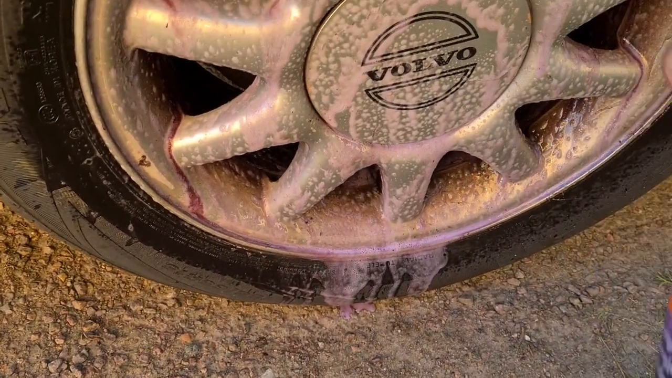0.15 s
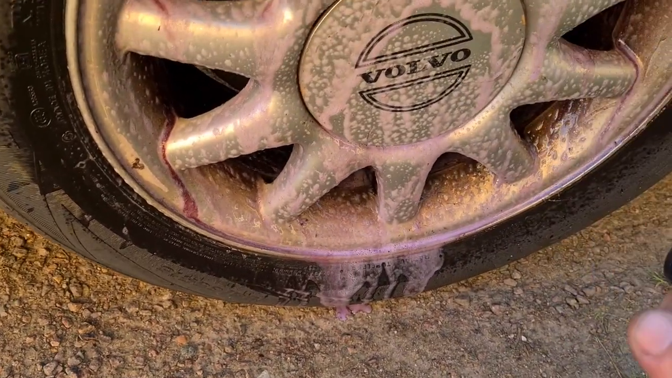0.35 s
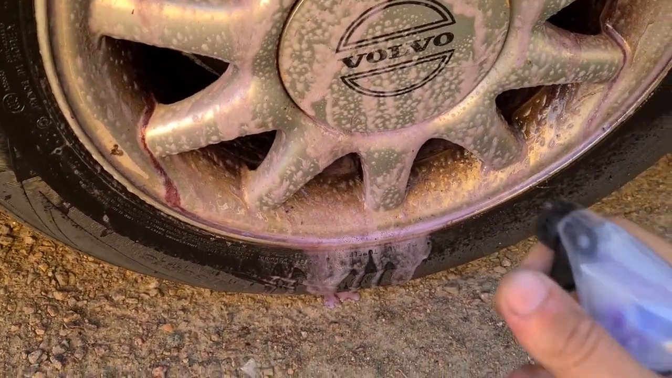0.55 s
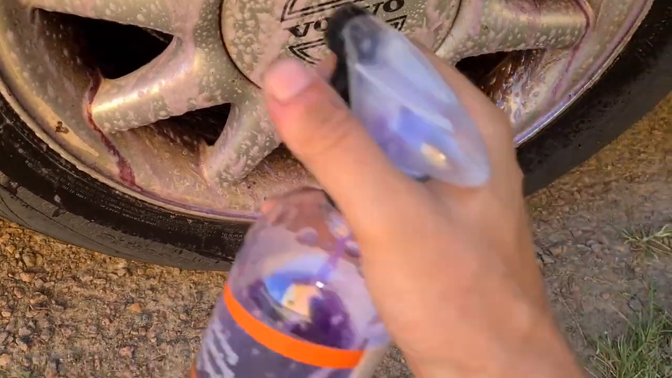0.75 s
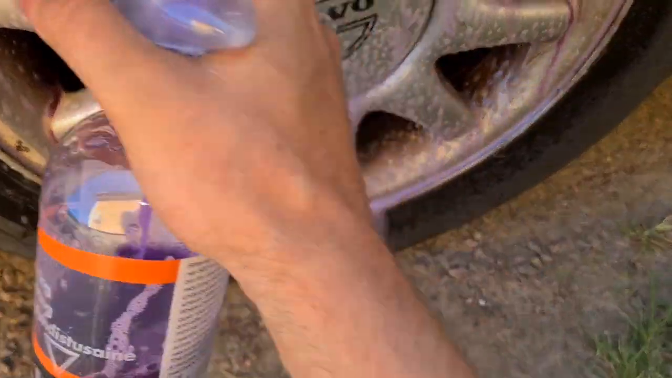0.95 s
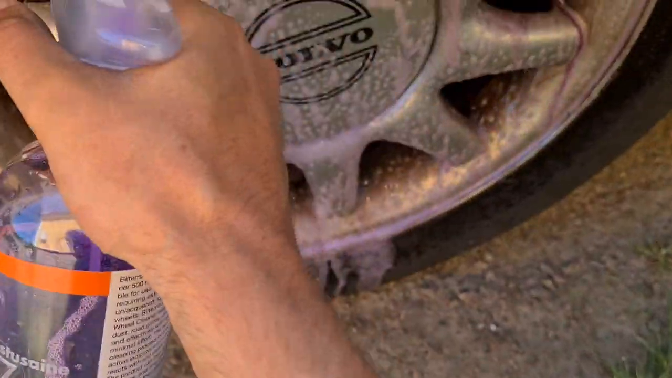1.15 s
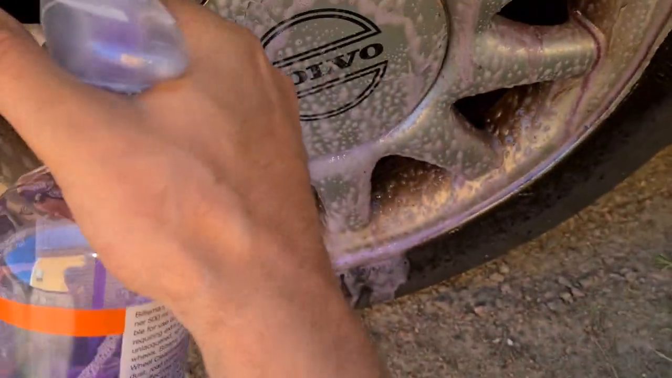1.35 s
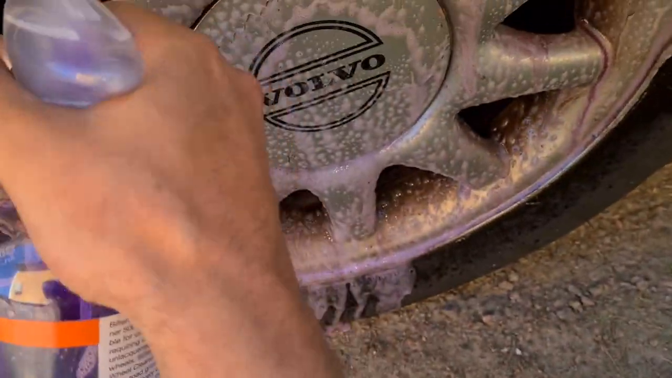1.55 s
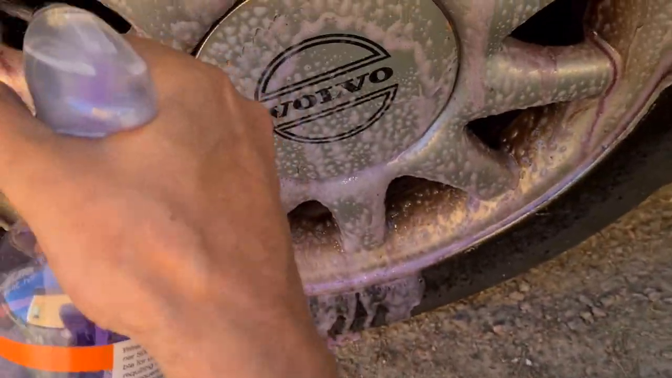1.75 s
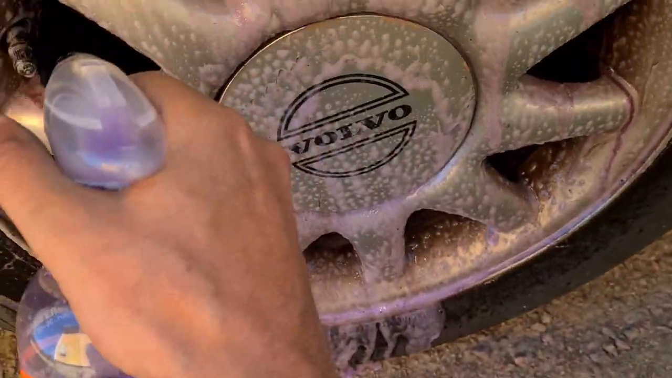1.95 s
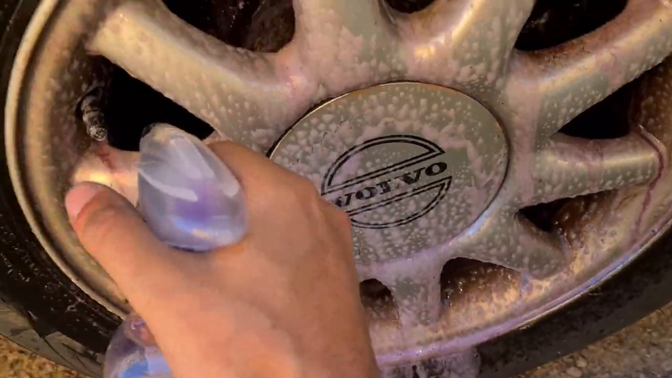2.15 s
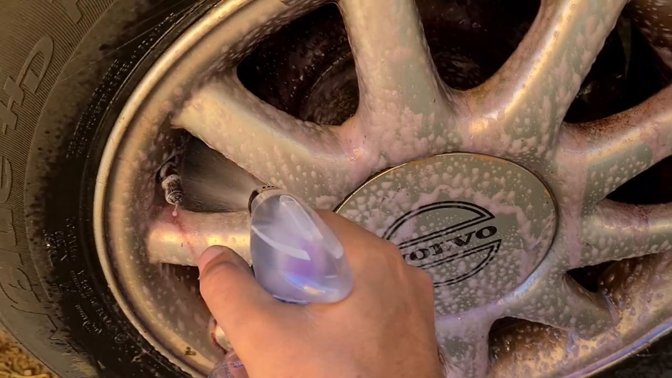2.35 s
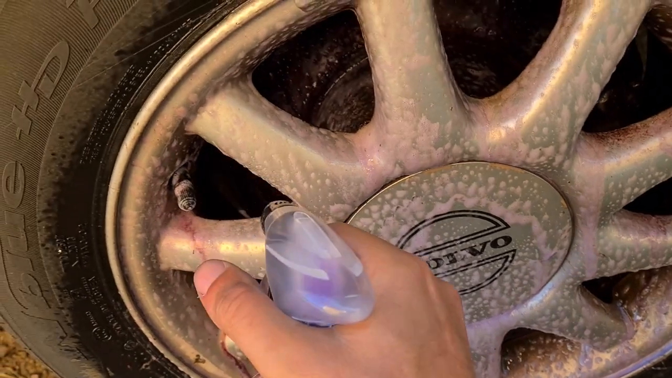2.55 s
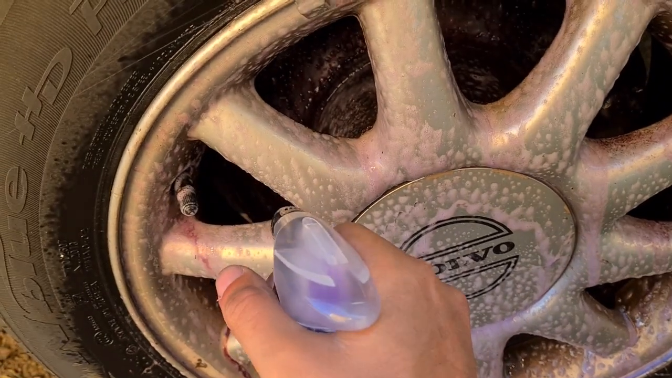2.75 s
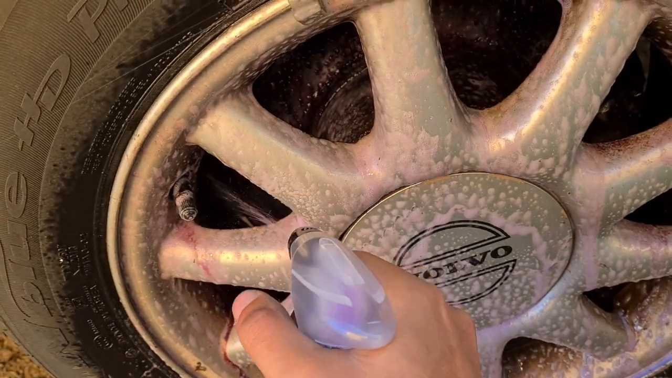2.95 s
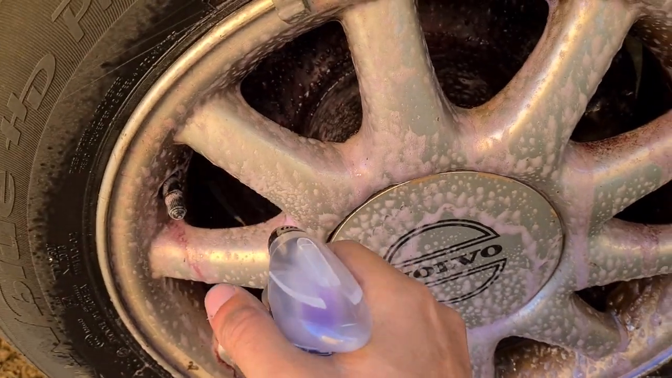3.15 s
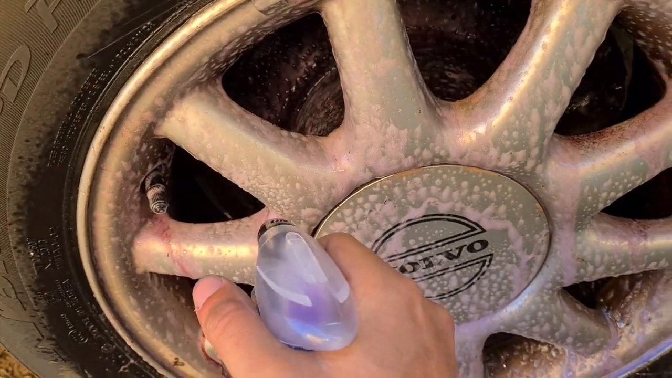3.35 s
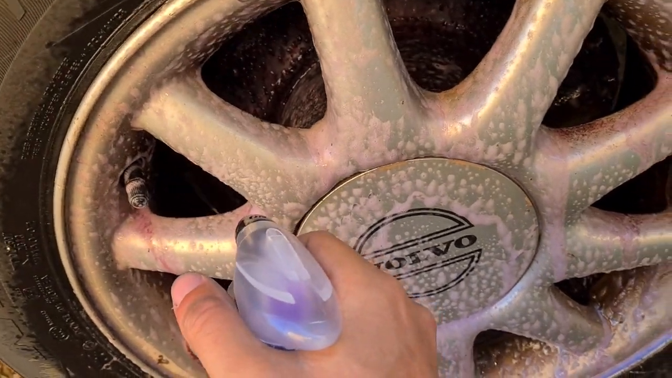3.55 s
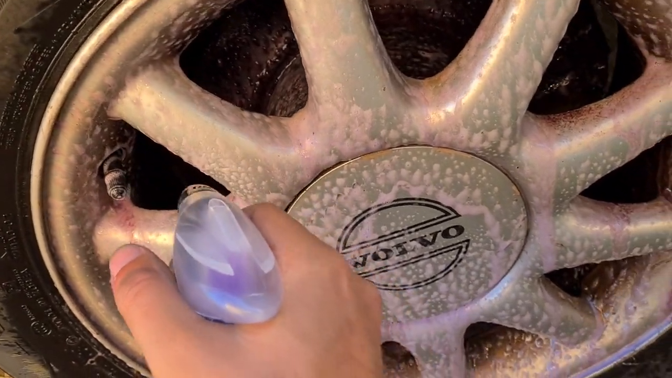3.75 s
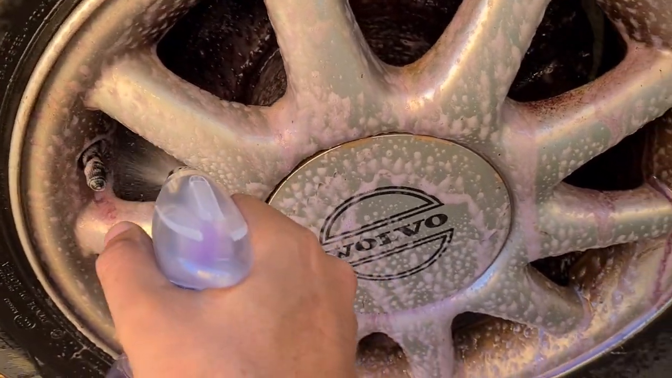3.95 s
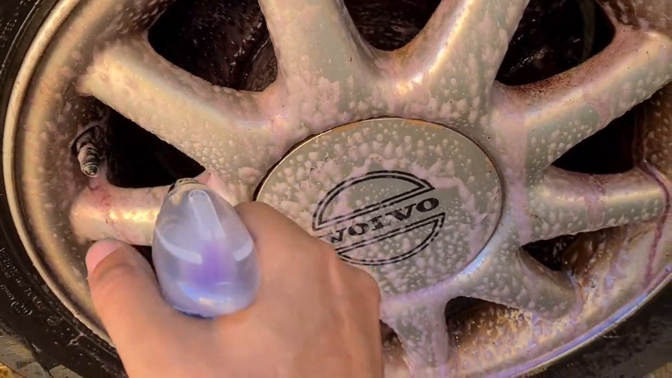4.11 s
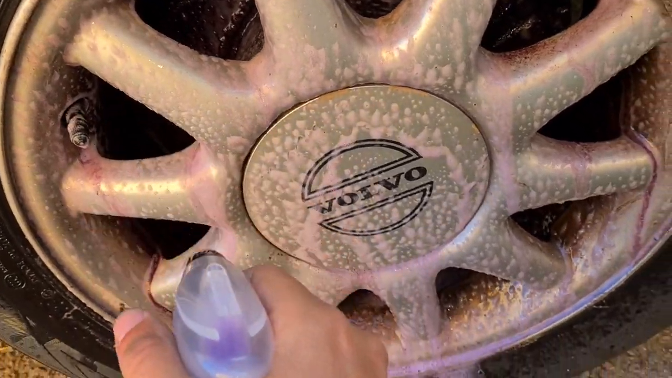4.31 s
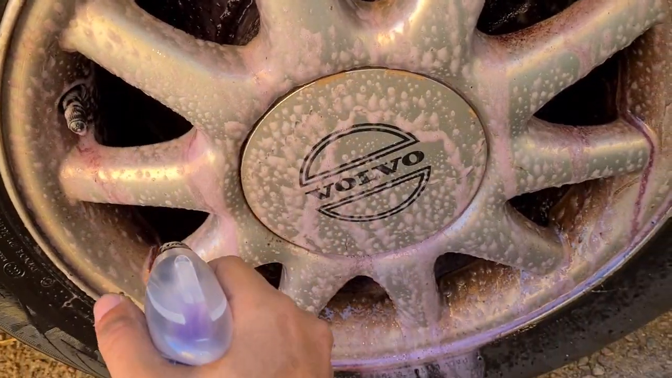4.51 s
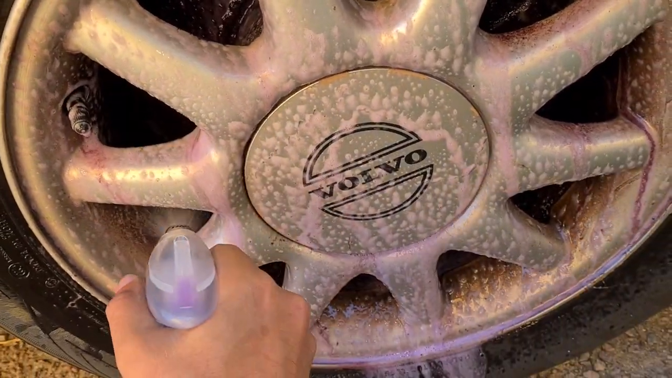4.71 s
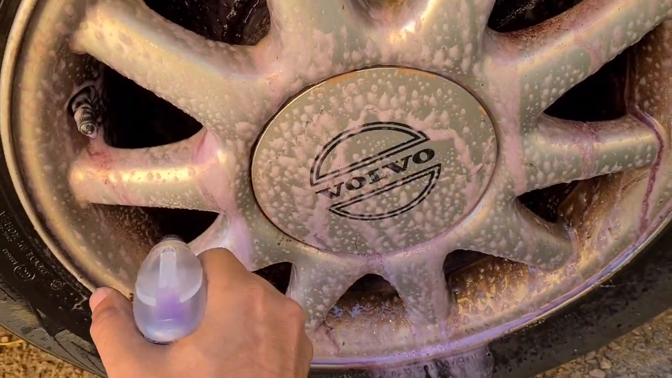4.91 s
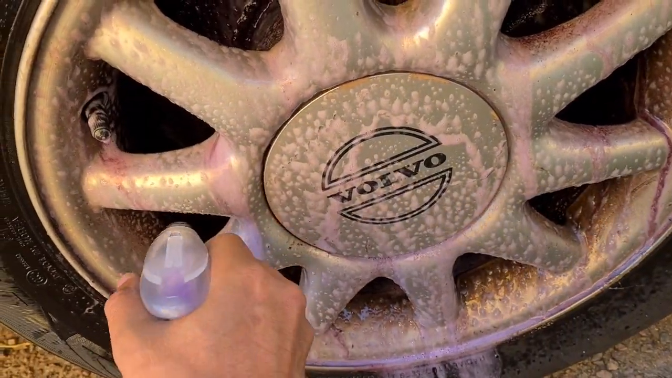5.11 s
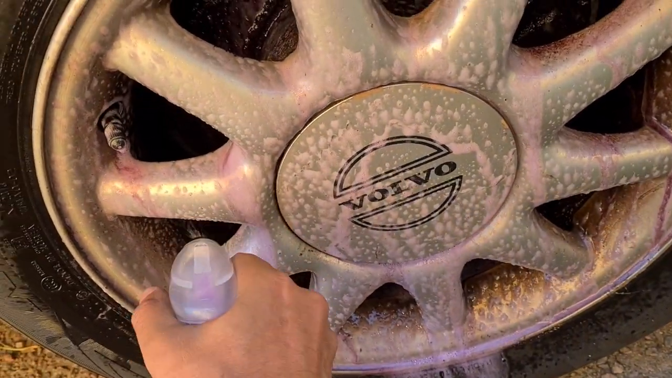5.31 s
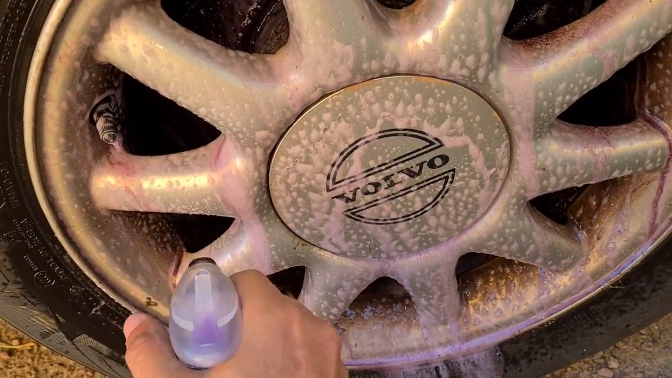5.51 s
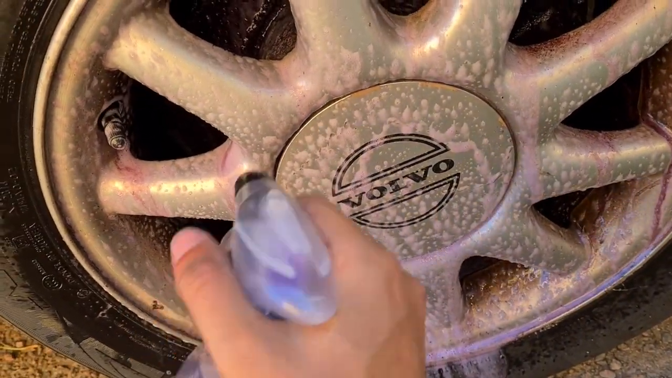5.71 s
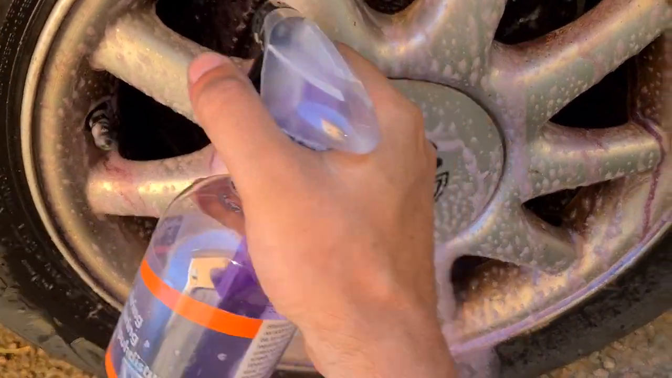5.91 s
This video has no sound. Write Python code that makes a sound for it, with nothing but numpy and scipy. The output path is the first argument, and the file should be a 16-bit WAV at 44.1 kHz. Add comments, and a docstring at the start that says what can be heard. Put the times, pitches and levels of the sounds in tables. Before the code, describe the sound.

Outdoors, close stereo microphones hear a plastic trigger bottle at the right spraying a car wheel. It opens with the trigger returning and grip knocks, then seven short sharp sprays, irregularly spaced, each swelling quickly in hiss and stopping with a fine airy tail. Hollow plastic clacks and bubbly valve sucks fill the gaps, above soft fizzing, slight rustling, a distant drone and small low air puffs.

```python
"""A trigger bottle sprays cleaner onto an alloy car wheel outdoors, close and to the right, over a low rumble.
First a dying wisp and a squeak of air, the trigger springing back, and knocks as the hand shifts its grip.
Then seven squeezes: slack taken up, the pump knocks, the jet drums on the wheel, hisses and trails off as mist;
the trigger springs back and the valve squelches as the pump refills. Fizz and rustle come and go throughout.
Liquid and air are shaped noise; the plastic and the wheel are sums of dying tones."""
import sys
import numpy as np
from scipy import signal
from scipy.fft import rfft, irfft
from scipy.io import wavfile
from scipy.ndimage import uniform_filter1d

SR = 44100
rng = np.random.default_rng(int(sys.argv[2]) if len(sys.argv) > 2 else 0)


def dump(signal):
    """Clip the signal to [-1, 1] and save it as 16-bit WAV at the path in sys.argv[1]."""
    limited = np.clip(np.atleast_2d(signal).T, -1, 1)
    pcm = np.round(limited * 32767).astype(np.int16)
    wavfile.write(sys.argv[1], SR, pcm)


N = 263277
TIME = np.arange(N) / SR  # seconds
HZ = np.fft.rfftfreq(N, 1 / SR)


def gain_of(db):
    """Turns decibels into a gain."""
    return 10 ** (np.asarray(db) / 20)


def evened(x):
    """Scales a stereo sound so that the average of its two sides has rms 1."""
    return x / np.sqrt(np.mean(x.mean(0) ** 2) + 1e-20)


def read(points):
    """Spreads a table of (pitch_hz, value) over all frequencies, on a log pitch scale."""
    hz, value = np.transpose(points)
    return np.interp(np.log(HZ + 1), np.log(hz + 1), value)


def add(mix, start_s, sound):
    """Lays a sound into the mix at a time."""
    part = mix[..., max(round(start_s * SR), 0):][..., :sound.shape[-1]]
    part += sound[..., :part.shape[-1]]


def grains(spread_db):
    """Two noise streams of countless droplets; a wider spread makes their sizes more uneven."""
    size_db = spread_db * np.minimum(rng.exponential(1, N), 6)
    return rng.standard_normal((2, N)) * gain_of(size_db)


def sputter(rate_hz, depth_db):
    """An uneven flow: a gain that wanders at random, mostly slower than the rate."""
    wander = irfft(rfft(rng.standard_normal(N)) / (1 + (HZ / rate_hz) ** 4), N)
    return gain_of(depth_db * wander / wander.std())


def burst(start_s, fade_s):
    """A level that snaps on at a time and dies away."""
    t = np.maximum(TIME - start_s, 0)
    return np.minimum(t / 0.0007, 1) * np.exp(-t / fade_s)


def ring(modes, t, pitch=1):
    """A struck thing rings as a sum of tones, each dying at its own speed."""
    return sum(gain_of(db - 60 * t / t60_s) * np.sin(2 * np.pi * hz * pitch * t) for hz, db, t60_s in modes)


def pair(spectra, likeness):
    """Makes two unrelated spectra partly alike, as two microphones hear them."""
    likeness = np.clip(likeness, -1, 1)
    left = likeness * spectra[1] + np.sqrt(1 - likeness ** 2) * spectra[0]
    return np.array([left, spectra[1]])


# how alike the two microphones hear the bottle: pitch_hz, likeness (0 to 1)
MIC_LIKENESS = [(60, 1), (240, 0.92), (480, 0.91), (950, 0.41), (1900, 0.67), (3800, .55), (7500, 0.27),
                (15000, 0.93)]
# how loud the left side is beside the right: pitch_hz, left_minus_right_db
MIC_LEAN = [(60, 7), (99, -9.5), (160, -8), (270, -1.5), (450, -8.5), (740, -10), (1220, -11.5),
            (2010, -12), (3330, -21), (5500, -26.5), (9080, -29), (15000, -14.5)]
# how far the left wave runs ahead of the right: pitch_hz, left_lead_radians
MIC_LEAD = [(500, 0.55), (1000, -1.07), (1400, 0.7), (1700, 2.5), (1900, 1.5), (2900, 2), (3600, 1),
            (4600, 11), (6000, -2.5), (9000, 8), (16000, 6.5)]


def nearby(x, colour):
    """Colours two noise streams and places them at the bottle, right of the microphones."""
    left = gain_of(read(MIC_LEAN)) * np.exp(1j * read(MIC_LEAD))
    likeness = np.clip(read(MIC_LIKENESS), 0, 1)
    # size of the sum of both sides, divided out so the colour holds in the middle
    middle = np.sqrt(1 + abs(left) ** 2 + 2 * likeness * left.real)
    sides = pair(rfft(x), likeness) * np.array([left, np.ones_like(left)])
    return evened(irfft(sides * colour / middle, N))


# tone colour of the still outdoor air: pitch_hz, relative_level_db
AIR_COLOUR = [(12, -36), (25, -15), (50, 11.5), (78, 2), (125, -5.5), (180, -7), (240, -26.5), (410, -26),
              (600, -23.5), (1100, -19), (1500, -14.5), (2300, -31), (2900, -20.5), (4800, -34.5),
              (5600, -51), (8000, -53), (12500, -35), (16000, -37.5)]
# tone colour of the soft low rustle: pitch_hz, relative_level_db
RUSTLE_COLOUR = [(110, -66), (180, -14.5), (295, -0.5), (385, 0), (474, -4), (690, -8.5), (1760, -16.5),
                 (2500, -19), (3250, -44.5), (5500, -120)]
# swells of the rustle: middle_s, half_length_s, level_db
RUSTLE_SWELLS = [(.35, 0.073, -63), (.54, 0.14, -60.5), (2.783, 0.49, -66), (5.13, 0.14, -60.5),
                 (5.4, 0.37, -61.5)]
# tone colour of the faint fizz: pitch_hz, relative_level_db
FIZZ_COLOUR = [(1200, -4.5), (1600, -0.5), (2200, -6), (3300, -3.5), (4500, -3), (6000, -5.5),
               (6700, -10.5), (7400, -27), (9100, -19.5), (12000, -19), (16000, -24)]
# stretches in which the fizz is up: start_s, end_s, level_db
FIZZ_STRETCHES = [(0, 0.596, -70.5), (1.414, 3.295, -70), (3.298, 5.148, -74)]


def outdoors(air_db=-63, hum_db=-64, hum_hz=84, rustle_rest_db=-70, fizz_rest_db=-83, fizz_edge_s=0.017):
    """Distant rumble and a wavering drone are wide and narrow noise; a rustle and a fizz swell over them."""
    likeness = read([(30, 1.0), (100, 0.8), (400, 0.59), (1500, 0.14), (5000, 0.14)])
    air = evened(irfft(pair(rfft(grains(0)), likeness) * gain_of(read(AIR_COLOUR)), N))
    hum_band = 1 / (1 + ((HZ - hum_hz) / 9) ** 2)
    drone = evened(irfft(pair(rfft(grains(0)), likeness) * hum_band, N))

    rustle = evened(irfft(pair(rfft(grains(3.66)), likeness) * gain_of(read(RUSTLE_COLOUR)), N))
    rustle = rustle * sputter(23.5, 2.46)
    swells = sum(gain_of(db) * np.exp(-((TIME - middle) / half) ** 2) for middle, half, db in RUSTLE_SWELLS)

    fizz = nearby(grains(4.4), gain_of(read(FIZZ_COLOUR)))
    fizz_up = sum(gain_of(db) * (TIME >= start) * (TIME < end) for start, end, db in FIZZ_STRETCHES)
    fizz_up = uniform_filter1d(fizz_up, round(fizz_edge_s * SR))  # softens the edges

    out = gain_of(air_db) * air + gain_of(hum_db) * drone
    out += rustle * np.hypot(gain_of(rustle_rest_db), swells)
    return out + fizz * np.hypot(gain_of(fizz_rest_db), fizz_up)


# puffs of air on the microphone: middle_s, level_db, length_s, centre_hz
AIR_PUFFS = [(1.227, -52, 0.053, 82), (2.939, -39.5, 0.054, 90), (4.388, -55.5, 0.053, 40),
             (4.742, -48.5, 0.044, 55), (5.377, -44, .05, 58)]


def puffs(width_octaves=0.74):
    """Moved air buffets the microphone: short swells of low noise, each around its own pitch."""
    eddies = pair(rfft(grains(0)), 0.88)
    out = np.zeros((2, N))
    for middle_s, db, length_s, hz in AIR_PUFFS:
        band = 1 / (1 + (np.log2((HZ + 1) / hz) / width_octaves) ** 4)
        swell = np.exp(-(2 * (TIME - middle_s) / length_s) ** 2)
        out += gain_of(db) * swell * evened(irfft(eddies * band, N))
    return out


# tone colour of the thin wisp that leaves the nozzle as pressure dies: pitch_hz, relative_level_db
WISP_COLOUR = [(6000, -20), (9500, -22), (12000, -6), (14000, -8.5), (15200, -1.5), (16000, -3.5)]


def vent(wisp_db=-57, squeak_db=-61, from_hz=3700, to_hz=4400):
    """At the start a dying wisp leaves the nozzle, and air squeaks into the bottle on a rising tone."""
    wisp = gain_of(wisp_db) * nearby(grains(1.8), gain_of(read(WISP_COLOUR)))
    wisp = wisp * np.minimum(TIME / 0.0015, 1) * np.exp(-(TIME / 0.04) ** 2)
    pitch_hz = np.interp(TIME, [0.04, 0.09], [from_hz, to_hz]) * sputter(200, 0.136)  # unsteady pitch
    squeak = np.sin(2 * np.pi * np.cumsum(pitch_hz) / SR)
    squeak = squeak * np.interp(TIME, [0.03, 0.08, 0.092], [0, 1, 0])
    return wisp + gain_of(squeak_db) * squeak * gain_of([[-10], [3]])  # left, right dB


# wet ticks of liquid in the bottle and nozzle: start_s, level_db, pitch_hz
WET_TICKS = [(.033, -54, 3660), (0.309, -55, 3950), (1.888, -51.5, 11100), (3.1749, -49, 3820),
             (4.35, -63, 3570), (4.46, -65.5, 4500), (4.977, -50, 4630), (4.996, -51, 4850),
             (5.1044, -54.5, 3550)]


def ticks(width_hz=800, fade_s=0.0047, wide_share=0.062):
    """Faint wet ticks between the squirts: short bursts of noise, each around its own pitch."""
    drops, out = grains(3), np.zeros((2, N))
    for start_s, db, hz in WET_TICKS:
        band = wide_share * (HZ < hz * 2) + 1 / (1 + ((HZ - hz) / width_hz) ** 2)
        less_bass = HZ / (HZ + hz)
        out += gain_of(db) * burst(start_s, fade_s) * nearby(drops, less_bass * band)
    return out


# each time the trigger springs back and the pump refills: start_s, knock_level_db (before the shared knock_db),
# knock_pitch_hz, wait_until_gulp_s, gulp_level_db (before the shared squelch_db), gulp_fade_s
TRIGGER_RETURNS = [(0.1037, -44, 1415, .0782, -37, 0.0041), (1.3815, -39.5, 1350, 0.065, -50, 0.015),
                   (1.905, -41, 1330, .0445, -43, 0.0045), (2.6186, -38.5, 1350, .043, -45, .006),
                   (3.1168, -43, 1340, 0.053, -50.5, 0.0047), (4.1743, -44, 1365, 0.032, -62, .007),
                   (4.9319, -38, 1406, 0.086, -41, 0.0054), (5.485, -42, 1370, 0.079, -75, 0.0065)]


def valve(squelch_db=-5, valve_hz=5710, width_hz=700, wide_share=0.07,
          bubbles_after_s=0.035, bubbles_db=-14, bubbles_fade_s=0.027):
    """After each return liquid is sucked through the valve: one gulp amid a run of smaller bubbles."""
    wet = gain_of(read([(1500, -9.5), (3500, 3.5), (6500, -1), (7500, -9.5), (12000, -5.5), (16000, -8)]))
    band = wide_share + 1 / (1 + ((HZ - valve_hz) / width_hz) ** 2)
    liquid = nearby(grains(3.9), wet * band)
    uneven, flow = sputter(70, 5), np.zeros(N)
    for start_s, _, _, wait_s, gulp_db, gulp_fade_s in TRIGGER_RETURNS:
        gulp = burst(start_s + wait_s, gulp_fade_s)
        bubbles = gain_of(bubbles_db) * burst(start_s + bubbles_after_s, bubbles_fade_s) * uneven
        flow += gain_of(gulp_db) * (gulp + bubbles)
    return gain_of(squelch_db) * liquid * flow


# knocks of the bottle as the hand shifts its grip: start_s, level_db (before the shared knock_db), pitch_hz
GRIP_SHIFTS = [(0.233, -48.5, 1450), (0.6386, -35, 1280), (1.8145, -41.5, 1370), (3.204, -50, 1440)]


def knocks(press_lag_s=0.0012, let_go_s=0.208, let_go_db=-50.5, pump_hz=1360):
    """Lists every knock as (start_s, level_db, pitch_hz): slack, press and let-go, the returns, the grips."""
    cycle = []
    for start_s, *_, slack_lead_s, slack_db, press_db in SQUEEZE_ROWS:
        cycle.append((start_s - slack_lead_s, slack_db, pump_hz))
        cycle.append((start_s + press_lag_s, press_db, pump_hz))
        cycle.append((start_s + let_go_s, let_go_db, pump_hz))  # the finger lets go
    return cycle + [row[:3] for row in TRIGGER_RETURNS] + list(GRIP_SHIFTS)


# ringing of the plastic pump head, shifted as a whole so its second tone meets the pitch of each knock:
# pitch_hz (before the shift), relative_level_db, t60_s (time to fall 60 dB)
PUMP_MODES = [(1145, -21, 0.0069), (1398, 10, 0.029), (1481, -1, 0.045), (1740, 0.5, 0.016),
              (2022, -7, 0.036), (3250, -14, 0.038)]


def trigger(knock_db=-2, rattle=1.0, give_s=0.0015, crack_db=-25,
            thud_db=-32, thud_hz=400, thud_lag_s=0.0135, thud_fade_s=0.0018):
    """Struck plastic rings, rattles and cracks; the bottle thuds as the piston takes up the liquid."""
    t, out = np.arange(SR // 10) / SR, np.zeros((2, N))
    contact_colour = read([(500, -10), (1500, 5.0), (3500, 6.5), (6000, -26.5), (7500, -25),
                           (12000, -7.0), (16000, -16)])
    contact = nearby(grains(0.78), gain_of(contact_colour))
    for start_s, db, hz in knocks():
        knock = ring(PUMP_MODES, t, hz / PUMP_MODES[1][0]) * (1 - np.exp(-(t / give_s) ** 2))
        scatter = rng.standard_normal((2, len(t))) * np.exp(-t / 0.009)  # loose parts chatter
        scatter = scatter / np.linalg.norm(scatter[0])
        knock = knock + rattle * signal.fftconvolve(knock[None], scatter, axes=1)[:, :len(t)]
        knock = knock / abs(knock).max() * gain_of([[-2], [2]])  # left, right dB
        crack = contact[:, round(start_s * SR):][:, :len(t)]
        crack = gain_of(crack_db) * crack * np.minimum(t / give_s, 1) * np.exp(-t / 0.0032)
        add(out, start_s, gain_of(db + knock_db) * (knock + crack))
    thud = np.sin(2 * np.pi * thud_hz * t) * np.exp(-abs(t - thud_lag_s) / thud_fade_s)
    for row in SQUEEZE_ROWS:
        add(out, row[0], gain_of(thud_db) * thud)
    return out


# ringing of the wheel under the jet: pitch_hz, relative_level_db, t60_s (time to fall 60 dB)
WHEEL_MODES = [(535, -9, 0.066), (824, -9.5, 0.1), (1366, -3.5, 0.041), (1378, -2.5, 0.1), (1772, 6, 0.019),
               (3237, -0.5, 0.039), (3490, -2.5, 0.045)]


def wheel(jet, ring_db=-11):
    """The alloy rings faintly with the drops that strike it, harder where the jet is louder."""
    t = np.arange(SR // 3) / SR
    jet_middle = jet.mean(0)
    drops = grains(3.0) * np.sqrt(abs(uniform_filter1d(jet_middle ** 2, 300)))
    rung = signal.oaconvolve(drops, ring(WHEEL_MODES, t)[None], axes=1)[:, :N]
    return gain_of(ring_db) * jet_middle.std() * nearby(rung, 1)


STROKE_S = 0.15  # from the start of a squeeze until the piston bottoms out


def spits(first_db=-9, last_low_db=-55, last_high_db=-47, within_s=0.045, fade_s=0.0021):
    """The nozzle spits a drop as the slack is taken up, and a last one at some moment after the stroke."""
    fine, flow = nearby(grains(3.9), gain_of(read(WISP_COLOUR))), np.zeros(N)
    for start_s, *_, slack_lead_s, slack_db, _ in SQUEEZE_ROWS:
        flow += gain_of(slack_db + first_db) * burst(start_s - slack_lead_s, fade_s)
        last_s = start_s + STROKE_S + rng.uniform(0, within_s)
        flow += gain_of(rng.uniform(last_low_db, last_high_db)) * burst(last_s, fade_s)
    return fine * flow


def stroke(start_s, crest_s, start_db, end_db, run_out_s, linger_db):
    """Level of one squeeze: the valve opens, pressure swells and sags, then the flow runs out."""
    attack_s = 0.004
    t = np.maximum(TIME - start_s + attack_s / 2, 0)
    rise_db = start_db * np.maximum(1 - t / crest_s, 0) ** 2.72
    sag_db = end_db * np.clip((t - crest_s) / (STROKE_S - crest_s), 0, 1) ** 2
    after = np.maximum(t - STROKE_S, 0)
    fall = np.exp(-after / run_out_s) + gain_of(linger_db) * np.exp(-after / 0.0083)
    return np.minimum(t / attack_s, 1) * gain_of(rise_db + sag_db) * fall


def spokes(x, start_s, dull_db, hollow_hz, scatter=0.22, hollow_db=-6, hollow_width_hz=260):
    """Each aim meets other spokes: a few short reflections ripple the sound and hollow out one band."""
    first = round((start_s - 0.02) * SR)
    part = x[:, first:first + SR // 2]
    hz = np.fft.rfftfreq(part.shape[1], 1 / SR)
    delay_s = rng.uniform(0.00096, 0.0082, (2, 8, 1))
    sign = rng.choice([-1, 1], (2, 8, 1))
    echoes = (sign * np.exp(-2j * np.pi * hz * delay_s)).sum(1) / np.sqrt(8)
    # bass bends round the spokes; the top comes straight from the nozzle
    reach = hz / (hz + 700) / (1 + (hz / 9000) ** 4)
    colour_db = hollow_db / (1 + ((hz - hollow_hz) / hollow_width_hz) ** 2)
    colour_db = colour_db - dull_db / (1 + ((hz - 7400) / 2300) ** 6)
    return first / SR, irfft(rfft(part) * (1 + scatter * reach * echoes) * gain_of(colour_db))


def splutter(x, patchy_db):
    """Clumps of drops land on changing spots, so narrow bands flare and fade in hundredths of a second."""
    bands = signal.stft(x, nperseg=512)[2]
    patches = rng.standard_normal(bands.shape[1:])
    patches = uniform_filter1d(patches, size=4, axis=0)  # across pitch
    patches = uniform_filter1d(patches, size=3, axis=1)  # across time
    bands = bands * gain_of(patchy_db * patches / patches.std())
    return signal.istft(bands, nperseg=512)[1][:, :N]


# one row a squeeze: start_s, time_to_full_pressure_s, wisp_end_s (after the start; a short fade follows),
# jet_level_db, hiss_above_jet_db, hiss_dulling_db, hollow_hz, right_minus_left_shift_db,
# slack_lead_s (before the start), slack_knock_db, pump_knock_db (both before the shared knock_db)
SQUEEZE_ROWS = [(1.107, 0.1, 0.19, -38.5, 8.5, 4.5, 5460, -12.5, .1127, -52, -42),
                (1.641, 0.072, 0.22, -38, 7, -2.5, 2500, -9.5, 0.047, -44.5, -26),
                (2.337, 0.084, 0.21, -38.5, 9.5, -2.5, 4500, -7.5, 0.058, -44, -35),
                (2.844, 0.12, .2, -37.5, 8, -0.5, 5300, -9, 0.045, -44, -32),
                (3.898, 0.11, 0.2, -38, 5.5, -5.5, 5600, -10, 0.046, -72, -28.5),
                (4.675, 0.089, 0.19, -39, 7.5, -2.5, 2130, -7.5, .058, -52, -53.5),
                (5.215, 0.1, 0.19, -35.5, 5.5, 6.5, 3760, -14, .053, -54, -45)]
# tone colours of the three parts of a spray, each: pitch_hz, relative_level_db
SPLASH_COLOUR = [(59, -19.5), (100, -3), (124, -22), (163, -17.5), (246, -20), (413, -10.5), (580, -9),
                 (827, -3.5), (1100, -6), (1350, 0), (1610, -2.5), (2120, -8), (2600, -8), (3380, -47),
                 (5720, -120)]
HISS_COLOUR = [(1350, -22), (2300, -3.5), (3090, 3), (3520, 1), (3810, 0.5), (4230, 4), (5280, -2),
               (6130, -3.5), (6570, -8), (7340, -22.5), (7600, -19), (9880, -41), (16700, -120)]
MIST_COLOUR = [(4350, -40), (7400, -22), (8870, -6.5), (14700, 1.5), (15300, 1), (16000, -22)]


def spray(wisp_db=-48, mist_above_jet_db=2.03, wisp_fade_s=0.061):
    """The jet drums on the wheel at once; the hiss and mist of the nozzle grow with pressure and end in a wisp."""
    splash = nearby(grains(2.3), gain_of(read(SPLASH_COLOUR))) * sputter(81, 0.2)
    hiss = nearby(grains(2.2), gain_of(read(HISS_COLOUR))) * sputter(98, 0.16)
    mist = nearby(grains(1.3), gain_of(read(MIST_COLOUR))) * sputter(70, 0.34)
    wisp = nearby(grains(1.5), gain_of(read(WISP_COLOUR))) * sputter(50, 3.0)
    out = np.zeros((2, N))
    for start_s, crest_s, wisp_end_s, jet_db, hiss_db, dull_db, hollow_hz, shift_db, *_ in SQUEEZE_ROWS:
        jet = splash * stroke(start_s, crest_s, -4.5, -3.0, 0.0065, -37.5)
        jet += gain_of(hiss_db) * hiss * stroke(start_s, crest_s, -19.0, -9.5, 0.0097, -15.5)
        jet += gain_of(mist_above_jet_db) * mist * stroke(start_s, crest_s, -21, -10, 0.011, -40.5)
        trail_s = [0, STROKE_S, wisp_end_s, wisp_end_s + wisp_fade_s]
        trail_db = np.interp(TIME - start_s, trail_s, [-59.5, 4, -6, -35.5], -200, -200)
        sound = gain_of(jet_db) * jet + gain_of(wisp_db + trail_db) * wisp
        part_s, sound = spokes(sound, start_s, dull_db, hollow_hz)
        add(out, part_s, sound * gain_of([[-shift_db / 2], [shift_db / 2]]))
    return out


def scene():
    """All sources at the microphones."""
    jet = splutter(spray(), 2.0)
    background = outdoors() + puffs()
    liquid = vent() + ticks() + spits() + valve()
    return background + liquid + trigger() + wheel(jet) + jet


def record(dry, edge_hz=15900):
    """The recorder's band limit: a steep filter removes what lies above the edge."""
    low_pass = signal.firwin(511, edge_hz, window=("kaiser", 9), fs=SR)
    return signal.oaconvolve(dry, low_pass[None], "same")


dry = scene()
out = record(dry)
dump(out)
```